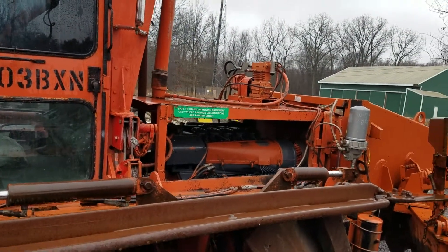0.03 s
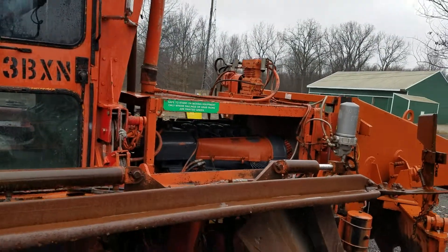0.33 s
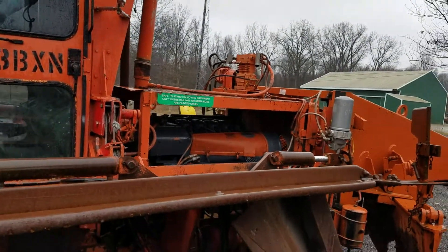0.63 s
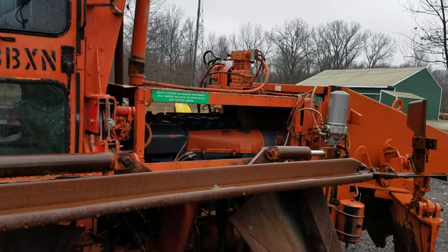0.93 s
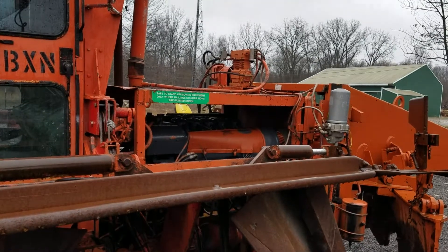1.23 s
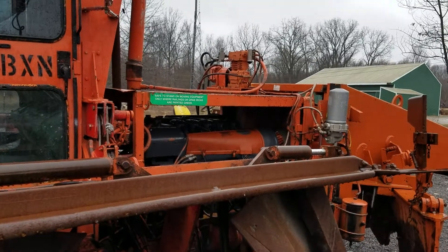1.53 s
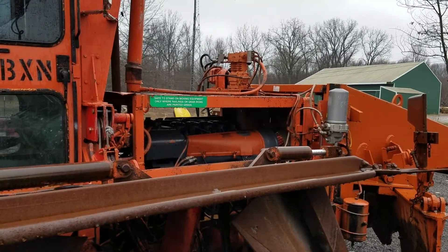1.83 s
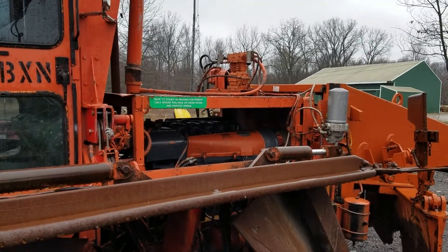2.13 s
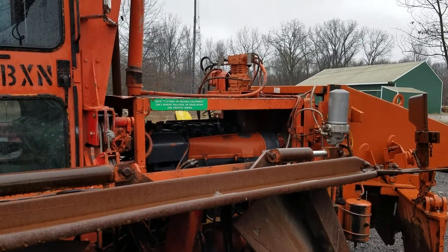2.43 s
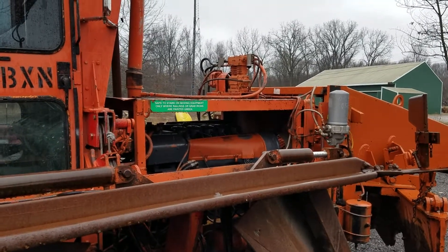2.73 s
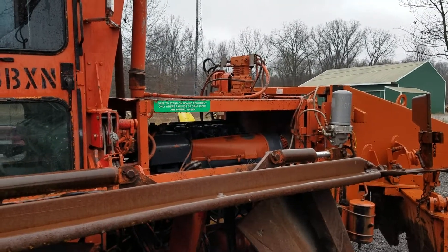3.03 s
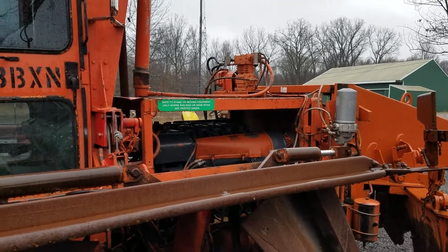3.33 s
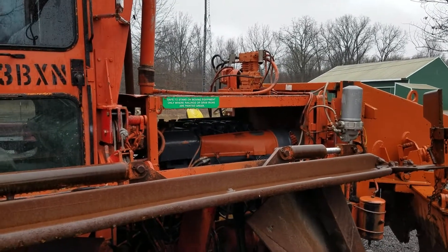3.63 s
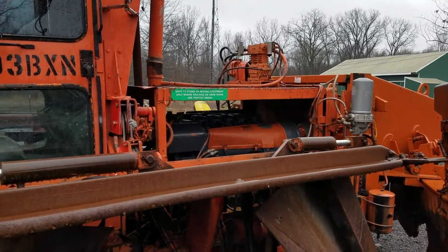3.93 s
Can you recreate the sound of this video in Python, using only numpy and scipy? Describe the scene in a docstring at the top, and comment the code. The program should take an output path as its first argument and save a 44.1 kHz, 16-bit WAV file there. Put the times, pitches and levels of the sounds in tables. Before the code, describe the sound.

Steady diesel idle of a parked track maintenance machine, droning and knocking with faint rapid ticks.

```python
"""A parked track machine in the open, a few metres from a stereo pair of microphones.
From the first moment its diesel engine is idling: five firings to a cycle, ten cycles a second.
Each cycle brings the same drone of exhaust and panels and the same knocks, over a rush of air and
loose rattle and a faint low hum. Light metal ticks, likely the valve gear, keep step on the left.
The idle holds, barely wandering, to the end of the four seconds."""
import sys
import numpy as np
from scipy import signal
from scipy.fft import rfft, irfft
from scipy.io import wavfile
from scipy.ndimage import uniform_filter1d, map_coordinates

SR = 44100
rng = np.random.default_rng(int(sys.argv[2]) if len(sys.argv) > 2 else 0)


def master_out(mix):
    """Clip the mix to full scale and print it as 16-bit PCM to the path in sys.argv[1]."""
    frames = np.transpose(np.atleast_2d(mix))
    ceiling = np.clip(frames, -1, 1)
    pcm = np.round(ceiling * 32767).astype(np.int16)
    wavfile.write(sys.argv[1], SR, pcm)


N = 176400
CYCLE_MS = 100  # one four-stroke cycle at nominal idle


def undb(db):
    """Decibels to gain."""
    return 10 ** (np.asarray(db) / 20)


def curve(hz, table, axis=1):
    """One column of a table, joined by straight lines over log frequency."""
    table = np.array(table)
    return np.interp(np.log(hz + 1e-9), np.log(table[:, 0]), table[:, axis])


def unit(x):
    """Scale to rms 1."""
    return x / np.sqrt(np.mean(np.abs(x) ** 2))


def wander(rate_hz):
    """A random drift of rms 1 that glides to a new value rate_hz times a second."""
    hold = int(SR / rate_hz)
    steps = np.repeat(rng.standard_normal(N // hold + 1), hold)
    return unit(uniform_filter1d(steps, hold)[:N])


def right_lag(hz):
    """Phase turn of the longer path to the right microphone."""
    # Each row: frequency in Hz, lead of the left microphone in radians.
    lead = [(60, 0.19), (150, 0.29), (300, 0.44), (700, 0.63), (1290, 1.3), (1890, 0.93), (2330, 0.67),
            (2840, 1.95)]
    return np.exp(-1j * curve(hz, lead))


def microphone_pair(hz, spectra):
    """Two unrelated spectra become left and right: alike but for the high treble, the right one late."""
    # Each row: frequency in Hz, correlation between the microphones.
    likeness = [(100, 0.7), (300, 0.77), (700, 0.53), (1400, 0.74), (2500, 0.51), (4000, 0.88), (8000, .05)]
    alike = np.clip(curve(hz, likeness), 0, 1)
    mid = np.sqrt((1 + alike) / 2) * spectra[0]
    side = np.sqrt((1 - alike) / 2) * spectra[1]
    return np.array([mid + side, (mid - side) * right_lag(hz)])


def knock_envelope(ms):
    """Combustion and piston knocks: each jumps up and dies quickly to a steady bed."""
    # Each row: start in ms into the cycle, relative strength in dB.
    knocks = [(10.5, 1.5), (19.5, -1), (34.5, -3.5), (39, 7), (48, -0.5), (55, 5), (63.5, -7.5), (75, 3),
              (87.5, 1), (98.5, 1)]
    decay_ms, bed_db = 1.6, -4
    power = sum(undb(db) ** 2 * np.exp(-2 * ((ms - at) % CYCLE_MS) / decay_ms) for at, db in knocks)
    return unit(np.sqrt(power + undb(bed_db) ** 2))


def hum():
    """A faint, wavering low hum out of step with the cycle, perhaps the cooling fan."""
    hum_hz, level_db = 43.7, -47
    return undb(level_db + wander(3)) * np.sqrt(2) * np.sin(2 * np.pi * hum_hz * np.arange(N) / SR)


def rush(cycles):
    """Air and loose rattle: new in every cycle, swelling a little with the knocks."""
    # Each row: frequency in Hz, relative noise level in dB on the left, the same on the right.
    spectrum = [(20, -56, -53), (45, -54.5, -48.1), (90, -56.5, -46), (127, -45, -47.8), (166, -41, -45),
                (280, -42, -39), (380, -46, -47.5), (726, -39, -46.5), (840, -46.5, -51),
                (1200, -43, -53.5), (2020, -47, -47), (2663, -51, -47.0), (3035, -60.5, -61.5),
                (4270, -62.5, -62), (4630, -57.5, -61), (6100, -62, -76.8), (8400, -63, -90),
                (10300, -66, -84.2), (11500, -61, -77), (14000, -63, -83), (15600, -62.5, -69)]
    trim_db, pulsing, flicker_db = -0.5, 0.23, 0.92
    swell = knock_envelope(cycles % 1 * CYCLE_MS) ** pulsing * undb(flicker_db * wander(40))
    hz = np.fft.rfftfreq(N, 1 / SR)
    noise = microphone_pair(hz, rfft(rng.standard_normal((2, N)) * unit(swell)))
    db = np.array([curve(hz, spectrum, axis=1), curve(hz, spectrum, axis=2)]) + trim_db
    return irfft(noise * undb(db), N) * np.sqrt(SR / 20)


def metal_ticks(cycles):
    """On the left, each part ticks once a cycle, never twice equally hard, and buzzes faintly between."""
    # Each row: start in ms into the cycle, ring in Hz, width in Hz, strength in dB, decay in ms.
    ticks = [(6.45, 6900, 7000, -30, 10.3), (10.5, 8780, 540, -30.5, 6), (25, 12840, 1000, -27, 3.2),
             (30.2, 5450, 150, -35.5, 11), (29.8, 8450, 240, -32, 8.3), (47, 8640, 1120, -25.5, 6.1),
             (50, 7100, 1300, -30, 3.8), (66.6, 11360, 610, -28, 5.4), (68.6, 8960, 470, -28, 6.6),
             (88, 9000, 2200, -32.5, 6.4)]
    scatter_db, rise_ms, right_db, buzz_db = 2.5, 1.42, -33, -20
    hz = np.fft.rfftfreq(N, 1 / SR) + 1
    out = 0
    for at, ring_hz, width_hz, db, decay_ms in ticks:
        strokes = cycles - at / CYCLE_MS + 1
        age_ms = strokes % 1 * CYCLE_MS
        strength = undb(db + scatter_db * rng.standard_normal(size=64))[strokes.astype(int)]
        envelope = strength * np.exp(-age_ms / decay_ms) * (1 - np.exp(-age_ms / rise_ms))
        resonance = 1 / (1 + 1j * (hz ** 2 - ring_hz ** 2) / (hz * width_hz * np.sqrt(2))) ** 2
        ring = unit(irfft(rfft(rng.standard_normal((2, N))) * resonance, N))
        out = out + ring * (envelope + undb(db + buzz_db))
    return out * undb([[0], [right_db]])


def clatter(ms, hz):
    """Stereo spectrum of one cycle of knocks, each a short burst of noise."""
    # Each row: frequency in Hz, relative level in dB.
    colour = [(20, -74.2), (60, -52.7), (180, -46.1), (380, -46.6), (550, -46.0), (750, -45.0),
              (900, -46.4), (1250, -45.6), (1600, -47.9), (2100, -49.5), (2550, -49.9), (3200, -61.0),
              (4500, -69.0), (7000, -77.6)]
    trim_db, top_hz = 1.5, 8000
    bursts = rng.standard_normal((2, len(ms))) * knock_envelope(ms)
    spectra = microphone_pair(hz, unit(rfft(bursts)))
    return spectra * undb(curve(hz, colour) + trim_db) * (hz > 0) * (hz < top_hz)


def body_rings(ms):
    """Spectrum of one cycle of exhaust pipe, panels and block ringing as damped sines."""
    # Each row: start in ms into the cycle, pitch in Hz, decay in ms, relative strength in dB.
    rings = [(7.2, 97, 14, -12), (28.2, 97, 14, -24), (49.5, 97, 14, -16), (68.9, 97, 14, -18),
             (88.9, 97, 14, -12), (77.8, 152, 22, -20), (98.4, 212, 12, -14), (30.7, 212, 12, -20),
             (12.7, 280, 8, -22), (46.2, 280, 8, -21), (86.1, 280, 8, -22), (23.3, 465, 10, -9),
             (57.3, 465, 9, -11), (71.2, 580, 7, -7), (15.4, 700, 7, -15), (38.6, 715, 7, -22),
             (51.6, 714, 14, -14), (77.3, 690, 8, -15)]
    rise_ms = 1
    ringing = 0
    for at, ring_hz, decay_ms, db in rings:
        age_ms = (ms - at) % CYCLE_MS
        swing = undb(db) * np.exp(-age_ms / decay_ms) * (1 - np.exp(-age_ms / rise_ms))
        ringing = ringing + swing * np.sin(2 * np.pi * ring_hz * age_ms / 1000)
    return rfft(ringing) / len(ms) * np.sqrt(2)


def engine(cycles):
    """One cycle of drone and knocks, repeated at the speed of the crankshaft."""
    # The drone's strong harmonics. Each row: multiple of the cycle rate, level in dB before panning.
    orders = [(5, -46.6), (8, -43.8), (9, -30.4), (10, -23.8), (11, -31.6), (12, -38.4), (13, -48.9),
              (14, -36.2), (15, -28.9), (16, -34.1), (19, -39.1), (20, -38.7), (21, -35.9), (22, -35.0),
              (26, -34.6), (27, -37.7), (28, -39.8), (29, -39.4), (30, -33.1), (31, -40.7), (33, -38.5),
              (45, -35.9), (47, -38.3), (48, -33.6), (54, -40.4), (56, -35.9), (61, -39.2), (63, -40.2),
              (64, -38.2), (65, -38.6), (66, -39.5), (67, -40.2), (69, -32.7), (70, -29.8), (71, -33.9),
              (72, -39.9), (73, -36.8), (74, -30.3), (75, -38.8), (79, -39.9), (82, -40.6), (94, -41.2),
              (100, -38.4), (110, -41.2), (112, -39.2), (114, -38.3), (121, -39.5), (124, -39.5),
              (126, -35.4), (128, -38.2), (135, -40.5), (139, -40.3), (140, -39.2), (172, -41.5)]
    # Where the engine sits between the microphones. Each row: frequency in Hz, left minus right in dB.
    balance = [(100, -1.2), (250, 0), (450, 2.5), (720, 4), (1300, 3.5), (1900, 8.5), (2600, -5),
               (4000, 4.5), (7000, 9)]
    size = SR * CYCLE_MS // 1000
    ms = np.arange(size) * CYCLE_MS / size
    hz = np.fft.rfftfreq(size, 1 / SR)
    spectra = clatter(ms, hz)
    # The rings, joined by the knocks above 780 Hz, set only the phases of the drone.
    timing = body_rings(ms) + spectra[0] * (hz > 780)
    for order, db in orders:
        k = int(round(order))
        spectra[:, k] = undb(db) * timing[k] / abs(timing[k]) * np.array([1, right_lag(hz[k])])
    pan = undb(np.outer([.5, -.5], curve(hz, balance)))
    pan /= np.sqrt(np.mean(pan ** 2, axis=0))
    one_cycle = irfft(spectra * pan, size) * size / np.sqrt(2)
    return np.array([map_coordinates(side, [cycles % 1 * size], mode="grid-wrap") for side in one_cycle])


def scene():
    """Drone, knocks, rush and ticks follow the same crankshaft; the hum runs on its own."""
    # Each row: time in seconds, engine speed in four-stroke cycles a second.
    speed = [(0.0, 9.983), (0.4, 10.0), (0.7, 10.007), (1.1, 9.99), (1.5, 10.009), (2.05, 9.965),
             (2.4, 10.006), (2.8, 9.964), (3.35, 10.034), (3.8, 9.964), (4.0, 9.967)]
    cycle_rate = np.interp(np.arange(N) / SR, *np.array(speed).T)
    cycles = np.cumsum(cycle_rate) / SR
    return engine(cycles) + rush(cycles) + metal_ticks(cycles) + hum()


def record(dry):
    """The recorder thins the deepest bass and cuts the top."""
    low_cut_hz, top_hz = 33, 15720
    hz = np.fft.rfftfreq(N, 1 / SR) + 1
    thinned = irfft(rfft(dry) / np.sqrt(1 + (low_cut_hz / hz) ** 6), N)
    return signal.sosfilt(signal.ellip(12, .1, 80, top_hz, fs=SR, output="sos"), thinned)


dry = scene()
out = record(dry)
master_out(out)
```